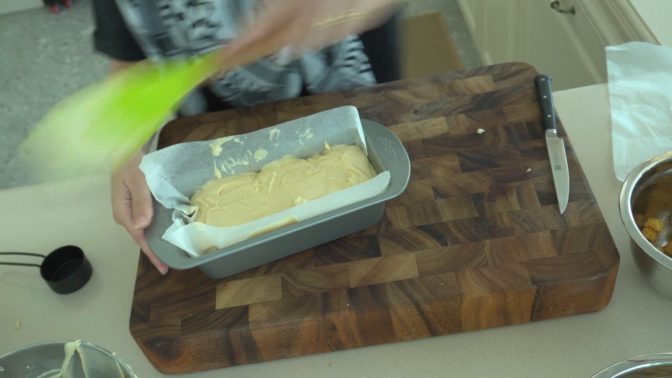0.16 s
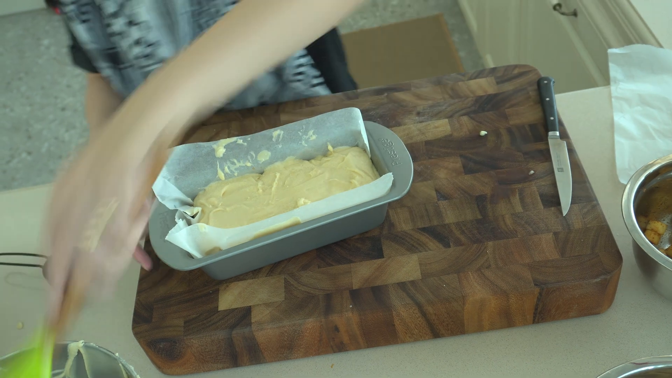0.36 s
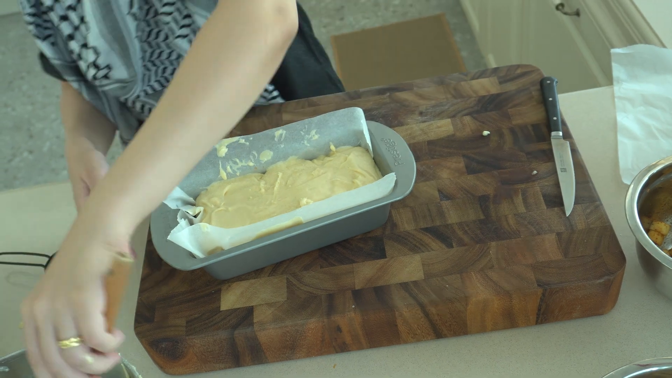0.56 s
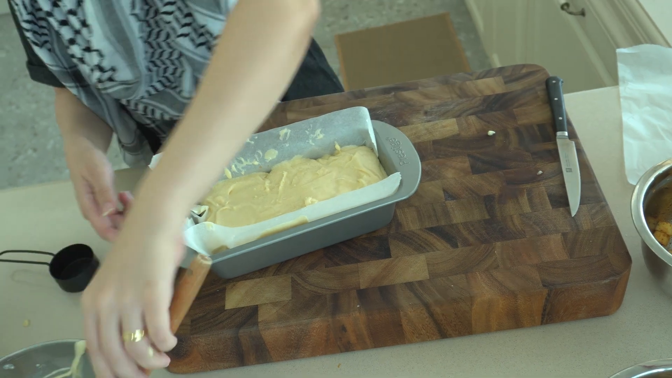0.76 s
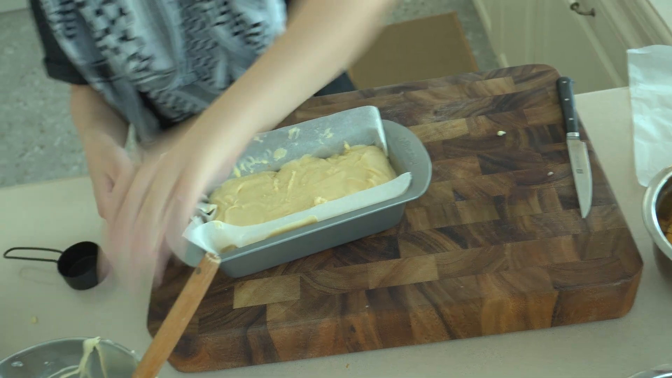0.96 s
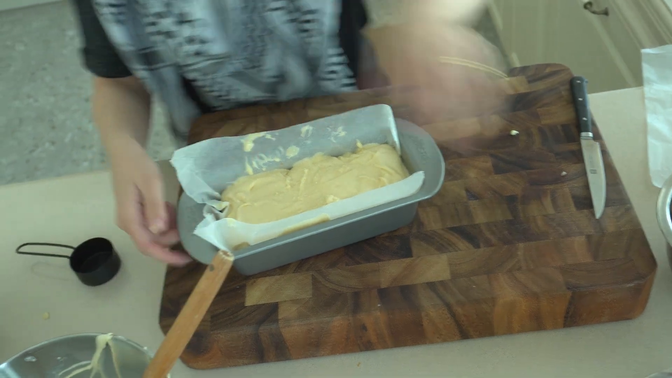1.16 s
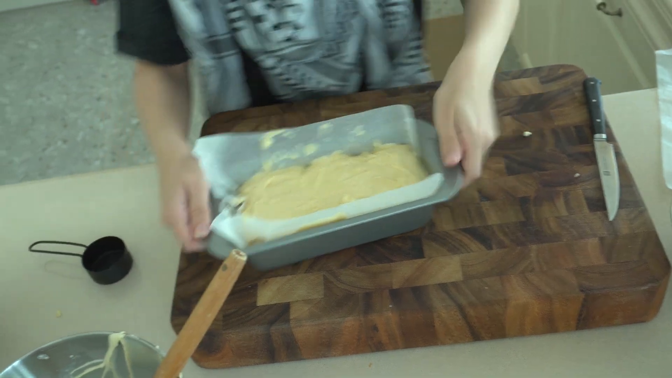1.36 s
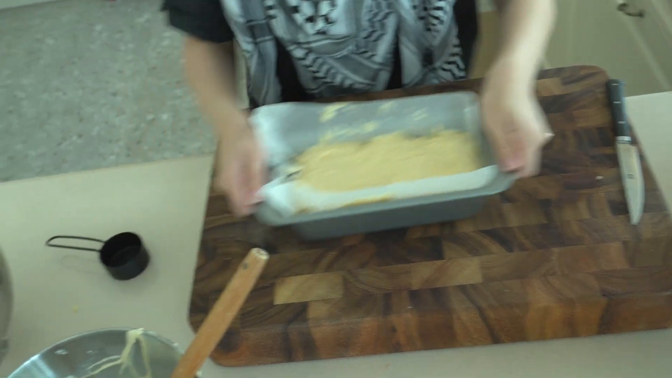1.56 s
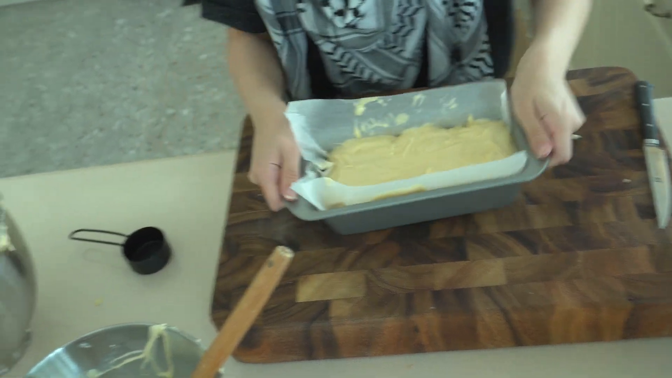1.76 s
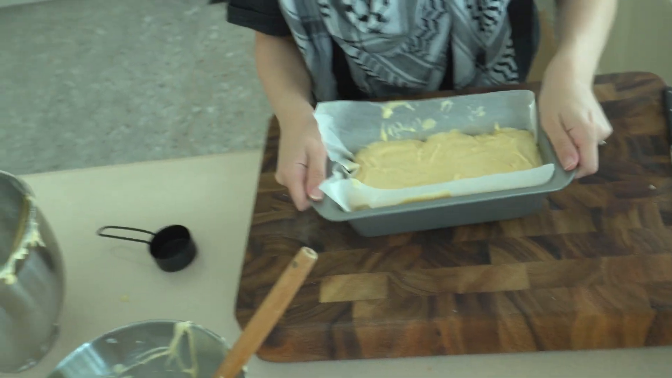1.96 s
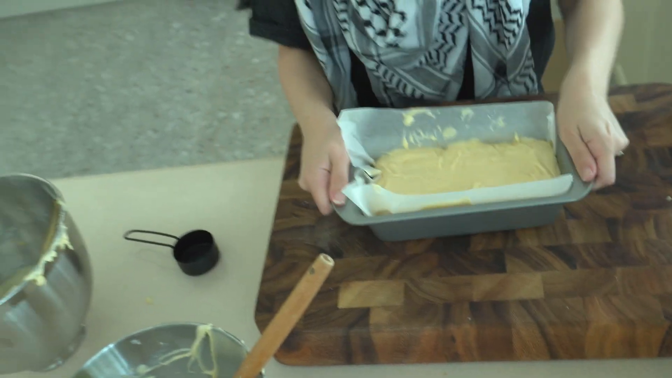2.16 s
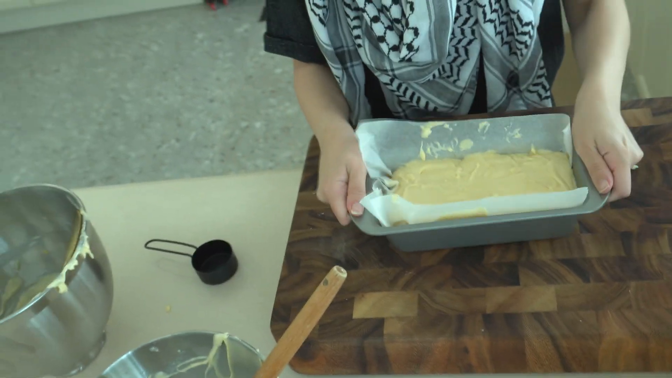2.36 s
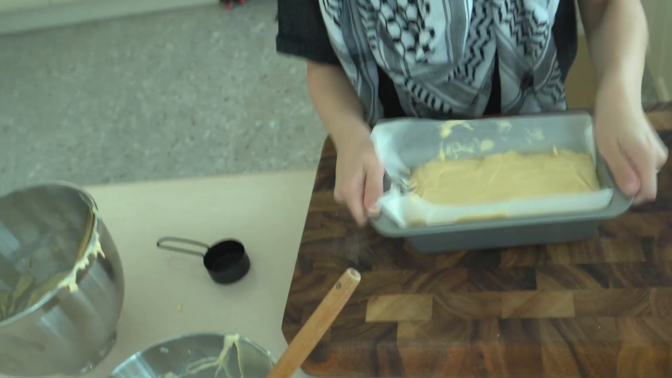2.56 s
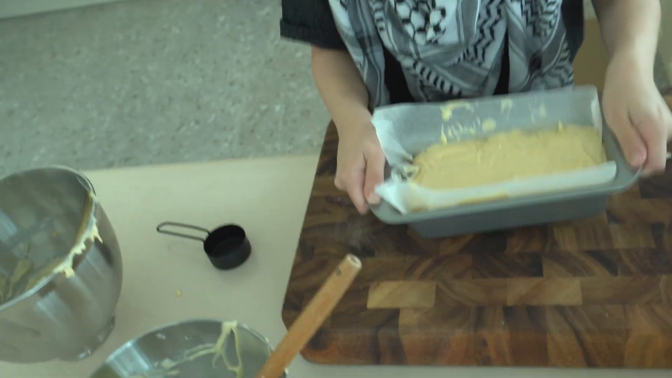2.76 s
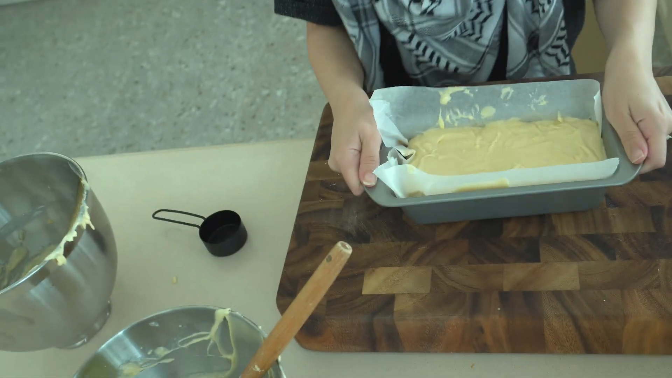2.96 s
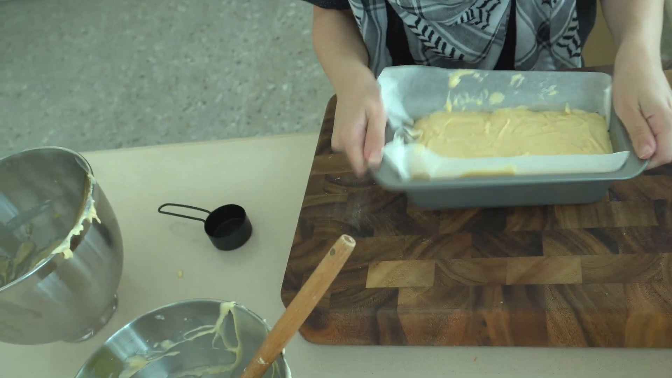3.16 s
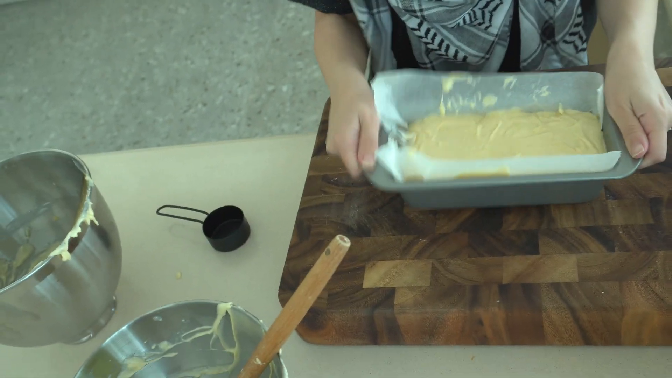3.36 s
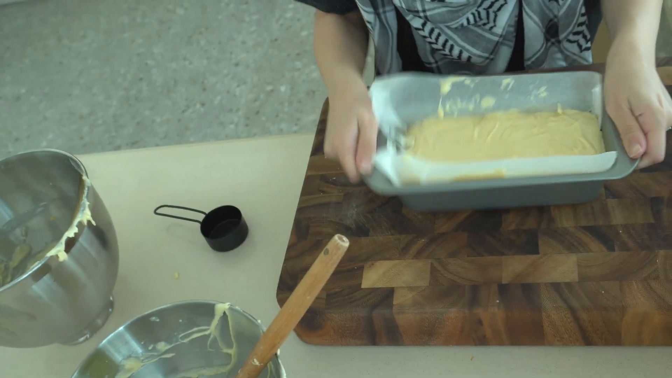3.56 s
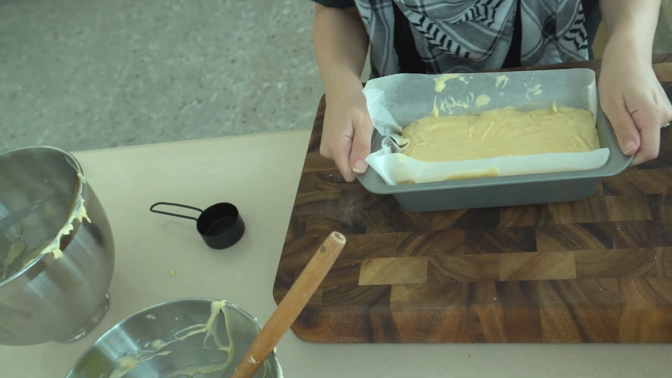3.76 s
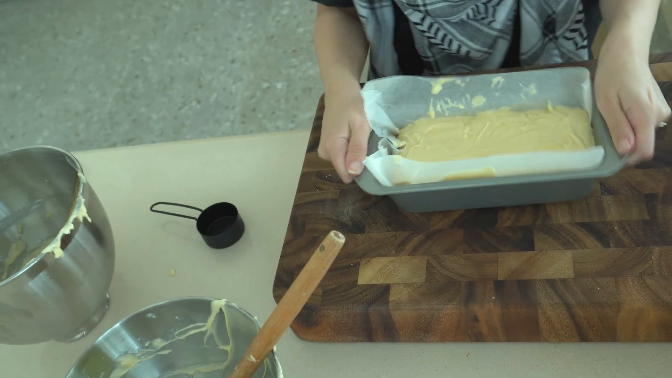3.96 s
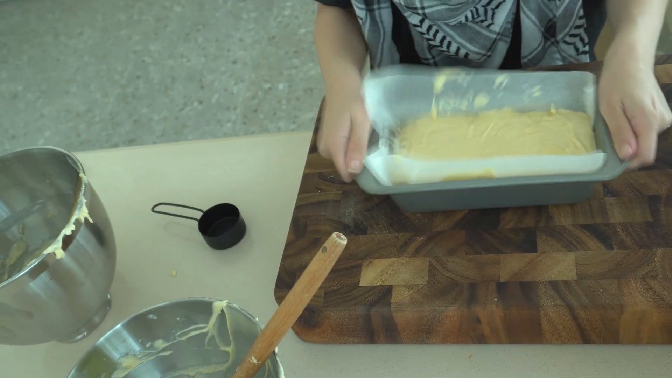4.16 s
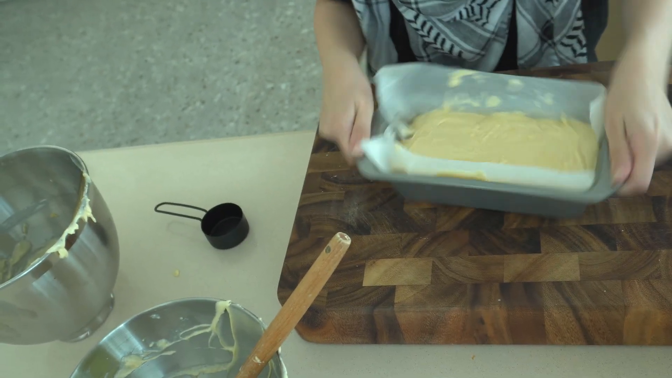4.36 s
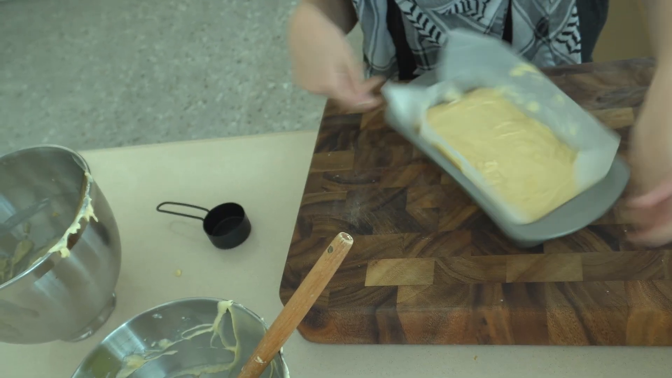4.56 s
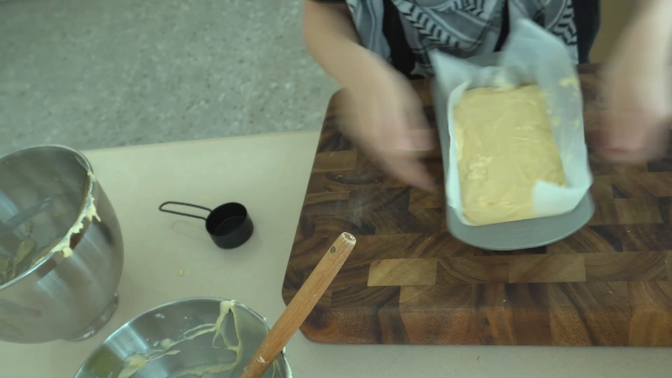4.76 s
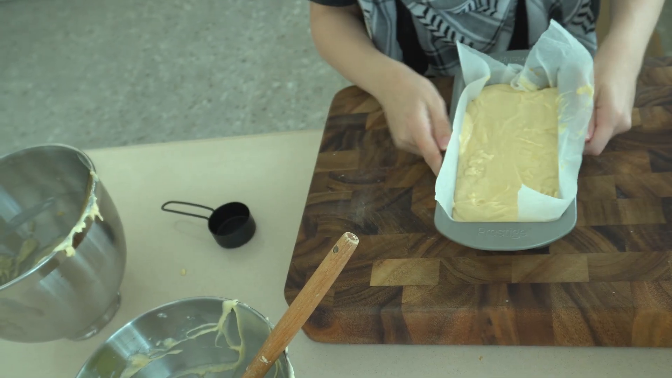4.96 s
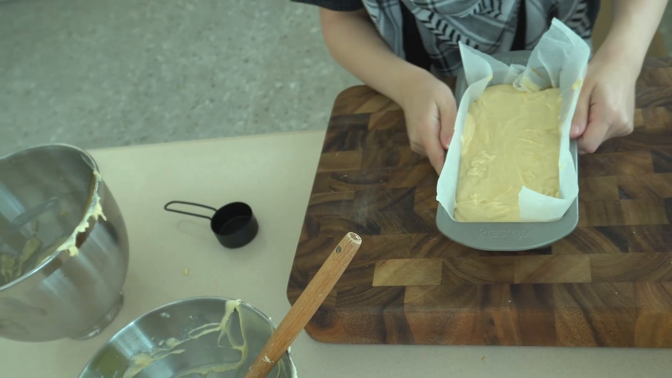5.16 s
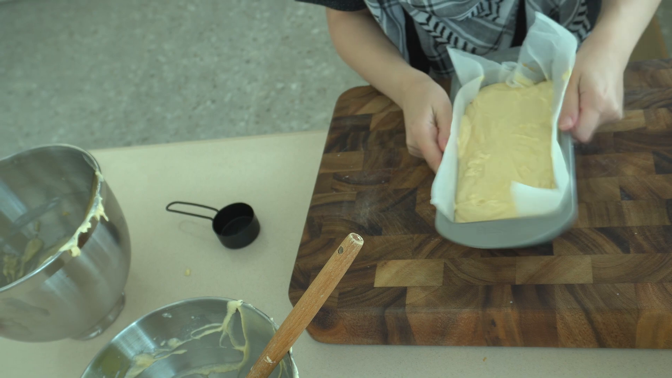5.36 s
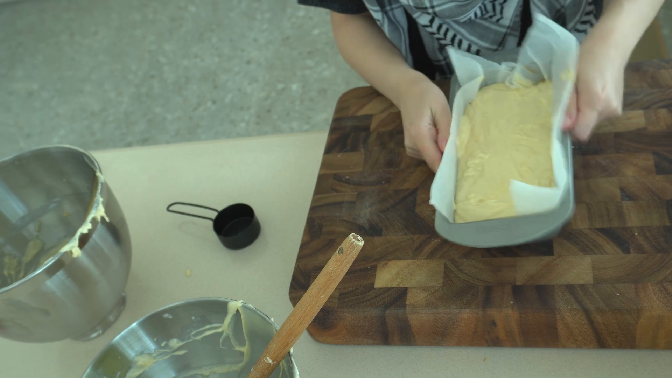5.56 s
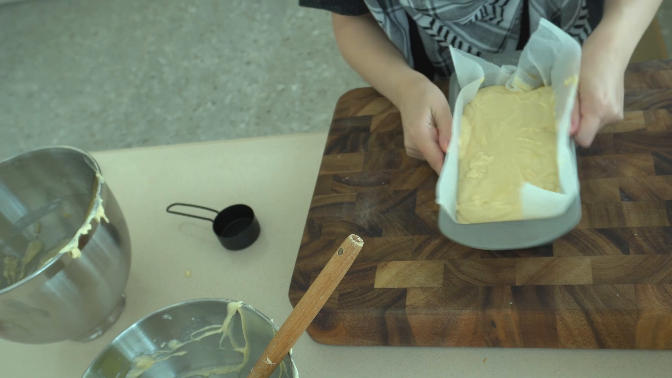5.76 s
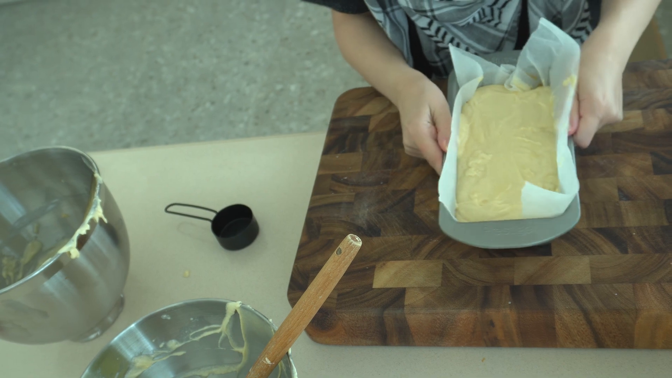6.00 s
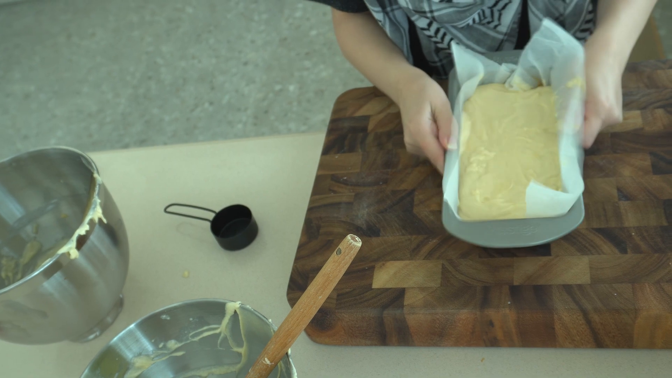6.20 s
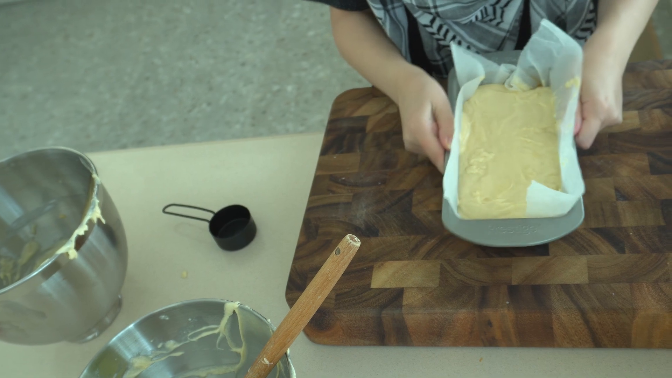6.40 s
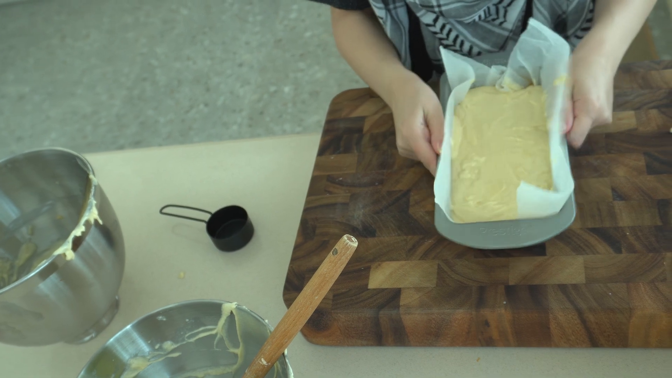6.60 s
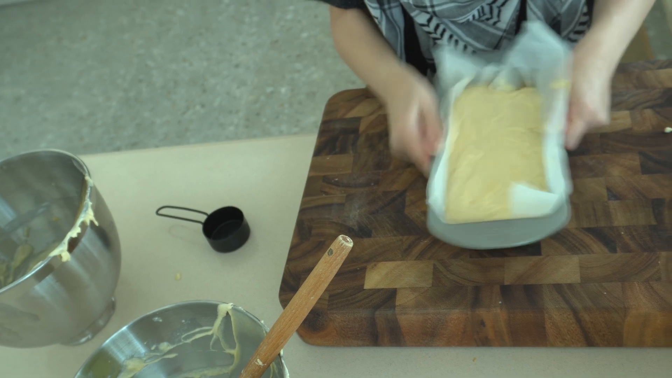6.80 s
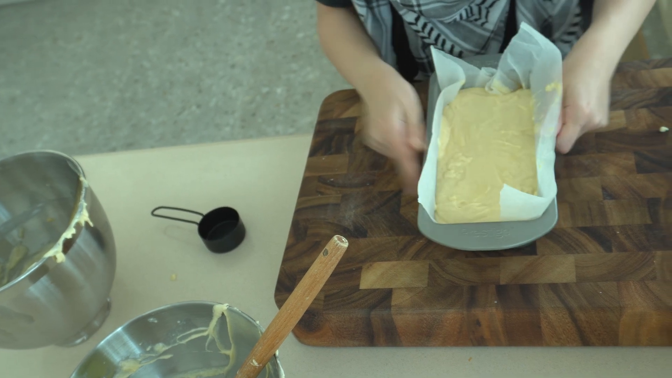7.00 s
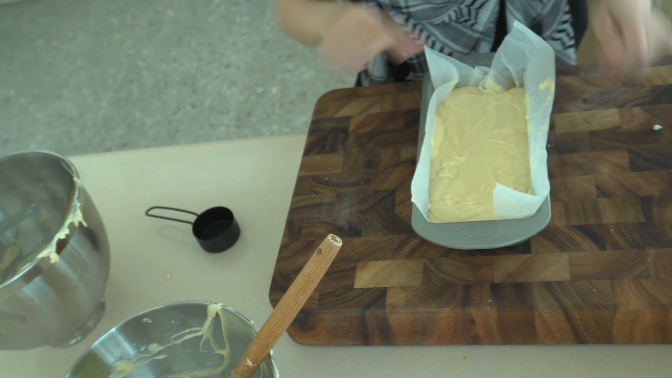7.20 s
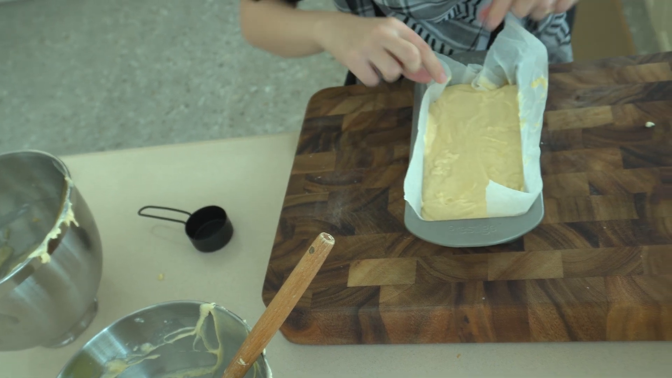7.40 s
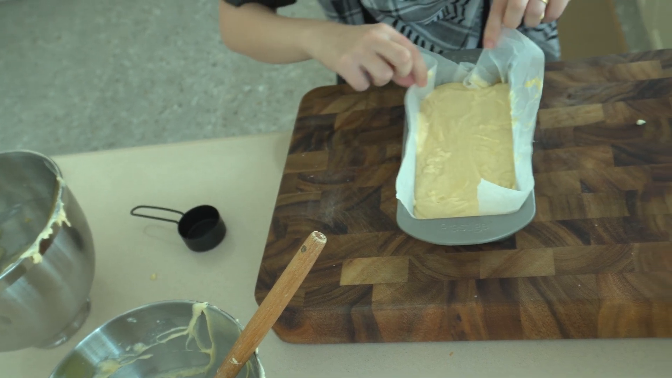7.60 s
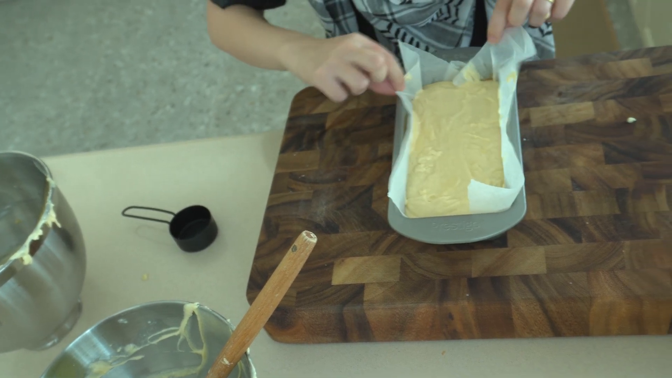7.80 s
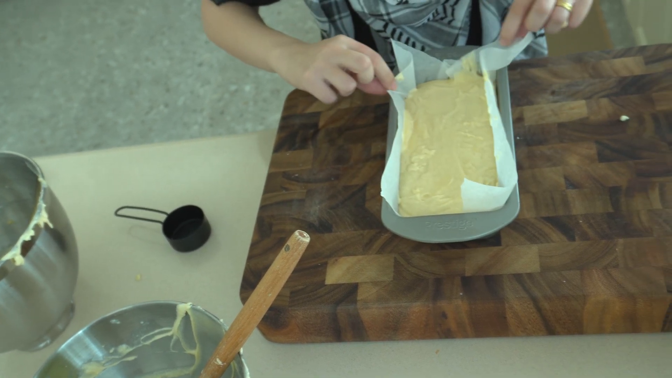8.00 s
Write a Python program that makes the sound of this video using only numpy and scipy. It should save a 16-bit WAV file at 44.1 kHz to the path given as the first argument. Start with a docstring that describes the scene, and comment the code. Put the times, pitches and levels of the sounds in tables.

```python
"""First fingers brush baking paper and a soft-bladed spatula bounces in a steel bowl (damped modes).
Hands then grip and shuffle a metal loaf pan full of batter (rim ticks, rocking modes, low noise).
Runs of knocks on a thick wooden board follow: contact noise and the modes of pan, board, counter and bowls.
At the end the paper is pinched and crackles: snapping creases over a bed of random grains.
A live kitchen adds echoes and a diffuse tail; low rumble and faint hiss last throughout."""
import sys
import numpy as np
from scipy import signal
from scipy.fft import rfft, irfft, next_fast_len
from scipy.io import wavfile
from scipy.ndimage import map_coordinates

SR = 44100
rng = np.random.default_rng(int(sys.argv[2]) if len(sys.argv) > 2 else 0)


def wav_record(signal):
    """Record a signal, one row per channel, as 16-bit PCM in the file named by sys.argv[1]."""
    frames = np.transpose(np.atleast_2d(signal))
    bounded = np.clip(frames, -1, 1)
    # unit amplitude maps onto the largest positive 16-bit level
    quanta = np.round(bounded * 32767).astype(np.int16)
    wavfile.write(sys.argv[1], SR, quanta)


N = 354563
T = np.arange(int(.8 * SR)) / SR  # time within one blow, s

# the pan lands on the board: [t/s, force level/dB, flatness (0 on an edge, 1 on its whole base),
# clank slope above 1 kHz/(dB per octave), bowl hum level/dB, lag of the base behind the edge/s]
KNOCKS = [(1.9434, -8, 1, 9, -36, 0.0045), (2.163, -6, 0.053, 0, -25.5, 0.0037),
          (2.4033, -4, 0.076, -2.5, -27, 0.0039), (2.639, -4.5, 0, 3, -20.5, .0037),
          (2.8882, -2, 0.24, -11, -26, 0.00081), (3.283, -7.5, 0.25, 1.5, -30, 0.0015),
          (3.51, -4, 0, 1.5, -21, 0.0013), (3.747, -7, 0.057, 0, -28, 0.0027),
          (3.998, -3.5, 0.05, 8, -22.5, .0015), (4.2407, -5.5, 0.26, -0.5, -24.5, .0015),
          (5.472, -10, 0.86, 9.5, -58, 0.001064), (5.7174, -6.5, 1, -7, -31.5, 0.00064),
          (5.9492, -7, 1, 9, -41, 0.00079), (6.203, -4, 0.91, -9, -25.5, 0.00065),
          (6.604, -11, 0.97, -4, -36, 0.0049), (6.8442, -9, 1, -9, -34, 0.0043)]
# modes of the pan, the board and the counter: [f/Hz, relative level/dB, t60/s]
PAN_MODES = [(646, -4, 0.02), (939, -6, 0.067), (1090, -14.5, 0.093), (1385, 4.5, 0.0067),
             (1577, 2.5, 0.018), (1640, 5, 0.0048), (1963, -8.5, 0.028)]
BOARD_MODES = [(203, 0, 0.029), (286, 0, 0.046), (406, 1, 0.045), (557, 0.5, 0.017)]
COUNTER_MODES = [(54.8, -15.5, 0.49), (84.7, -10.5, 0.25), (102.5, -6.5, 0.44), (148.8, -10.5, 1),
                 (171, -7.5, 0.13)]  # t60 before any extra damping
# modes of the bowls shaken through the counter: [f/Hz, relative level/dB, t60/s]
BOWL_HUM_MODES = [(393, -15, .5), (436, -15, .5), (465, -14, .5), (533, -14, .5), (896, -4, .36),
                  (905, 0, .52), (930, -3, .5), (1005, -12, .35), (1061, -12, .4), (1266, -9, .45),
                  (1550, -14, .4)]
# the hum's upper modes, which depend on where the pan lands: [t/s, added level/dB]
HIGH_HUM = [(2.9, -11), (3.2, 7.5), (6.2, 1)]
# spectra of a hard and of a soft contact: [f/Hz, relative level/dB]
CRACK_SPECTRUM = [(500, -8), (1500, 6.5), (2600, 2.5), (3700, 0), (5000, -2), (6200, -1), (8000, -11.5),
                  (11000, -18), (16000, -33)]
SOFT_SPECTRUM = [(100, -10), (600, 11), (8000, -26)]
# answer of each part to a knock: [level at full force on an edge/dB, growth/(dB per dB of force),
# level gained by landing flat/dB]
CLANK_LAW = (-14.5, 0.84, -8)  # the batter and the board damp a pan that lands flat
BOARD_LAW = (-21, 1, 6.75)  # a flat base drives the wood harder
CRACK_LAW = (-17, 1, -4.5)
THUD_LAW = (-24, 0.33, -0.29)  # the counter feels mostly the pan's weight
LOW_HUM_BELOW_HZ, HIGH_HUM_ABOVE_HZ = 700, 1200


def knocks():
    """Impact excitation: an edge cracks, the base slaps after it, and the coupled bodies ring in their modes."""
    out = np.zeros((2, N))
    for s, force_db, flat, bright_db, hum_db, slap in KNOCKS:
        # a flat landing is drier, shakes the paper liner and drives the bowls' low modes
        wet_db = -5 * flat
        edge_crack = burst(CRACK_SPECTRUM, t60=0.025)
        base_crack = late(burst(CRACK_SPECTRUM, t60=0.0052), slap)
        liner = amp(-18.5 + 18.3 * flat) * late(burst(CRACK_SPECTRUM, t60=0.093), slap)
        contact = edge_crack + amp(9) * base_crack + liner

        struck = [(hz, db + bright_db * max(np.log2(hz / 1000), 0), t60) for hz, db, t60 in PAN_MODES]
        # the grip and the batter shift the pan's modes
        edge, base = (ring(struck, spread_db=1.5, attack=0.00049, detune=0.043) for _ in range(2))
        metal = edge + amp(-8) * late(base, slap)
        wood = ring(BOARD_MODES, spread_db=1.5, attack=0.0007, detune=0.052)
        thud = ring(COUNTER_MODES, spread_db=4.5, attack=0.0043, detune=0.0073)
        thud = thud * amp(-30 * flat * T)  # a flat landing dies sooner

        high_db = np.interp(s, *np.transpose(HIGH_HUM))
        driven = []
        for hz, db, t60 in BOWL_HUM_MODES:
            low_gain = 13 * flat * (hz < LOW_HUM_BELOW_HZ)
            high_gain = high_db * (hz > HIGH_HUM_ABOVE_HZ)
            driven.append((hz, db + low_gain + high_gain, t60))
        hum = ring(driven, spread_db=2, attack=0.0064, detune=0.0021)

        # the edge grazes just before it lands
        add(out, s - .0035, amp(force_db - 25) * burst(SOFT_SPECTRUM, t60=0.33))
        # (delay/s, dry sound, reverberation/dB, blur, level/dB)
        parts = [
            (0, contact, -2.0, 0.23, answer_db(CRACK_LAW, force_db, flat)),
            (0.00031, metal, wet_db + 2.0, 0.15, answer_db(CLANK_LAW, force_db, flat)),
            (0.0011, wood, wet_db + 1.5, 0.13, answer_db(BOARD_LAW, force_db, flat)),
            (0.0051, thud, wet_db - 5.0, 0.16, answer_db(THUD_LAW, force_db, flat)),
            (0.003, hum, -13, 0.006, hum_db)]
        for delay, sound, part_wet_db, blur, db in parts:
            add(out, s + delay, sized(kitchen(sound, part_wet_db, blur), db))
    return out


def answer_db(law, force_db, flat):
    """Power-law response: a part's level is linear in the force level and in the flatness."""
    full_db, growth, flat_db = law
    return full_db + growth * force_db + flat_db * flat


# the pan rocks back onto the board after a flat landing: [t/s, level/dB]
REBOUNDS = [(5.734, -28), (5.966, -24.5), (6.219, -27), (6.617, -27), (6.8545, -22.5)]


def rebounds():
    """Secondary impact: the pan rocks back and softly excites board, pan and counter modes again."""
    out = np.zeros((2, N))
    for s, db in REBOUNDS:
        bodies = (BOARD_MODES, PAN_MODES, COUNTER_MODES)
        wood, metal, thud = (ring(modes, spread_db=4.5, attack=0.00073, detune=0.02) for modes in bodies)
        damped_thud = thud * amp(-60 * T / .12)
        bump = wood + amp(2.5) * metal + amp(-2) * damped_thud
        add(out, s, sized(kitchen(bump, wet_db=-13, blur=0.076), db))
    return out


# the spatula bounces, and is jolted once more by the hardest knock: [t/s, relative level/dB]
SPATULA = [(0.598, -33), (.841, -7.5), (.849, -10.5), (.853, -12.5), (.860, -11.5), (.868, -13.5),
           (2.927, -8.5)]
# modes of the struck bowl: [f/Hz, relative level/dB, t60/s]
BOWL_STRUCK_MODES = [(280, 0, 0.1), (460, -4, 0.26), (533, -3, 0.29), (600, 2, 0.08), (690, -1, 0.11),
                     (1050, -7, 0.05), (1320, -6, 0.045), (1743, -6, 0.055), (2153, -21, 0.25),
                     (2950, -13, 0.05), (4460, -28, 0.3), (6180, -21, 0.28), (7500, -14, 0.05)]


def spatula():
    """Modal ringing of a steel bowl, excited by the repeated impacts of a soft blade."""
    out = np.zeros((2, N))
    for s, db in SPATULA:
        bowl = ring(BOWL_STRUCK_MODES, spread_db=1, attack=0.0003, detune=0.005)
        hard = burst(CRACK_SPECTRUM, t60=0.04)
        soft = burst(SOFT_SPECTRUM, t60=0.035)
        blow = bowl + amp(-18) * hard + amp(-8) * soft
        add(out, s, amp(db - 1.5) * kitchen(blow, wet_db=-6, blur=0.11))
    return out


# hands catch the rim, or it rattles as it settles, and the pan rocks:
# [t/s, relative tick level/dB, relative rocking level against the tick/dB]
GRIPS = [(1.3689, -8.5, -17.5), (1.5659, -26, -16.5), (1.5858, -27, -27), (1.7935, -31, -34),
         (1.965, -29, -20), (1.978, -35, -32)]
# modes of the rim: [f/Hz, relative level/dB, t60/s]
RIM_MODES = [(690, -4, .07), (2120, 1, .08), (2420, -1, .05), (4310, -14, .13), (4603, -15, .28),
             (5862, -17, .07), (7850, -21, .07)]
# soft bumps on the counter: [t/s, relative level/dB]
BUMPS = [(0.293, -36.5), (1.231, -34), (1.856, -32), (2.804, -19), (7.693, -32), (7.951, -32.5)]
# the pan shuffles and judders over the board: [t/s, level/dB]
SHUFFLE = [(1.5, -54), (1.6, -32.5), (1.772, -38.5), (1.922, -26), (2.213, -27), (2.353, -32)]
# spectrum of the judder: [f/Hz, relative level/dB]
JUDDER_SPECTRUM = [(25, -17), (70, 6), (280, -10), (1500, -70)]


def handling():
    """Impact and friction: hands tick the rim, rock the pan, bump the counter and shuffle the pan as noise."""
    out = np.zeros((2, N))
    rock_modes = [(107, -10.0, 0.056), (228, -2.5, 0.038), (297.6, -9.5, 0.11)]  # [f/Hz, dB, t60/s]
    for s, db, rock_db in GRIPS:
        rim = ring(RIM_MODES, spread_db=1.5, attack=0.00035, detune=.004)
        tick = rim + amp(-4.0) * burst(CRACK_SPECTRUM, t60=0.017)
        rock = ring(rock_modes, spread_db=3.0, attack=0.00051)
        # a faint papery noise leads into each tick
        add(out, s - .013, amp(db - 31.0) * burst(PAPER_SPECTRUM, t60=1.0))
        add(out, s, amp(db - 4) * kitchen(tick, wet_db=-3, blur=0.17))
        add(out, s + 0.0056, amp(db + rock_db + 20.5) * kitchen(rock, wet_db=-18.5, blur=0.12))
    for s, db in BUMPS:
        bump = ring(COUNTER_MODES, spread_db=2.0, attack=0.0012, detune=0.078)
        bump = bump * amp(-60 * T / 0.64)  # extra damping
        add(out, s, amp(db + 6.5) * kitchen(bump, wet_db=-10.0, blur=0.31))
    s, db = np.transpose(SHUFFLE)
    level = amp(np.interp(np.arange(N) / SR, s, db, left=-120, right=-120))
    return out + level * coloured(rng.standard_normal(N), JUDDER_SPECTRUM)


# the loudest paper creases snapping: [t/s, relative level/dB]
SNAPS = [(.014, -25), (2.371, -24), (3.668, -22.5), (3.7075, -20), (5.217, -25), (5.233, -26.5),
         (5.263, -29), (6.586, -23.5), (1.589, -27), (1.673, -25.5), (7.553, -27), (7.666, -22.5),
         (7.623, -17), (7.66, -20.5), (7.6908, -12.5), (7.728, -11.5), (7.739, -11), (7.747, -17.5),
         (7.778, -17), (7.794, -14.5), (7.813, -11), (7.819, -18.5), (7.874, -18.5), (7.901, -17.5),
         (7.922, -17), (7.928, -7.5)]
# spectrum of crackling paper: [f/Hz, relative level/dB]
PAPER_SPECTRUM = [(300, -14), (1200, 7.5), (2500, 6), (6500, -0.5), (9000, -7), (16000, -23)]
GRAINS_PER_S = 2800  # for each facet size


def paper():
    """Crackling noise: stiff baking paper as snapping creases over a random train of tiny grains."""
    crinkle = np.zeros(N)
    for hz in (1300, 2070, 3800, 6100, 10800):  # facets of each size crackle on their own
        happens = rng.random(N) < GRAINS_PER_S / SR
        sizes = rng.standard_normal(N) * amp(4 * rng.standard_normal(N))
        band = [(hz / 3, -30), (hz, 0), (hz * 3, -30)]
        crinkle += np.sqrt(hz) * coloured(happens * sizes, band)
    crinkle = brushing() * coloured(crinkle, PAPER_SPECTRUM)
    tail = signal.fftconvolve(crinkle[None], reverberation(), axes=1)[:, :N]
    out = crinkle + amp(-2.0) * stereo(*tail)
    for s, db in [*SNAPS, *small_creases()]:
        add(out, s, snap(db))
    return out


# fingers brushing over the paper: [start t/s, length/s, relative level/dB]
BRUSHES = [(0.08, 0.2, -59), (1.403, 0.16, -45), (1.56, 0.032, -31.5), (1.636, 0.062, -37.5),
           (4.48, 0.083, -48.5), (4.64, 0.3, -51.5), (7.528, 0.26, -49), (7.717, 0.37, -47)]
BRUSH_ATTACK_S, BRUSH_RELEASE_S = 0.021, 0.012  # time constants
CATCHES_PER_S, CATCH_DB = 90, 3  # rate of the random points, and their spread


def brushing():
    """Stick-slip friction: each stroke rises, holds and dies away, its strength catching and slipping."""
    t = np.arange(N) / SR
    level = np.zeros(N)
    for s, length, db in BRUSHES:
        attack = 1 - np.exp(-np.maximum(t - s, 0) / BRUSH_ATTACK_S)
        release = np.exp(-np.maximum(t - s - length, 0) / BRUSH_RELEASE_S)
        level += amp(db) * attack * release
    points = rng.standard_normal(int(t[-1] * CATCHES_PER_S) + 2)
    catches = map_coordinates(points, [t * CATCHES_PER_S])
    return level * unit(amp(CATCH_DB * catches))


PINCH_START_S, PINCH_END_S = 7.55, 8.04
PINCH_RISE_S = 0.062  # time constant of the tightening fingers
CREASES_PER_S, CREASE_DB, CREASE_SPREAD_DB = 50, -30, 3.5  # levels relative, as in SNAPS


def small_creases():
    """Random yielding: (t/s, level/dB) of weak snaps, growing as the fingers tighten in the pinch."""
    slots = np.arange(PINCH_START_S, PINCH_END_S, 1 / CREASES_PER_S)
    times = slots + rng.random(len(slots)) / CREASES_PER_S
    grip = 1 - np.exp(-(times - PINCH_START_S) / PINCH_RISE_S)
    grip_db = 20 * np.log10(grip + 1e-6)
    return zip(times, CREASE_DB + grip_db + CREASE_SPREAD_DB * rng.standard_normal(len(slots)))


SNAP_HZ, SNAP_DB_PER_OCTAVE = 9030, 12  # pitch of a snap at 0 dB; weaker snaps are lower
FACET_RATIO = 1.362  # the facet's middle pitch over that of its snap


def snap(db):
    """Buckling: a crease snaps, its facet rings and the sheet pops; stiffer creases are louder and brighter."""
    hz = SNAP_HZ * 2 ** (db / SNAP_DB_PER_OCTAVE)
    facet_hz = FACET_RATIO * hz * 2 ** (.3 * rng.standard_normal())
    facet_modes = [(facet_hz, 0, .013), (facet_hz * 1.35, -6, .008), (1500, -5, .018)]
    facet = ring(facet_modes, spread_db=3.5, attack=.0001, detune=0.09)
    tick = burst([(hz / 4, -9), (hz, 0), (hz * 3, -12), (hz * 6, -26)], t60=0.01)
    pop = burst(PAPER_SPECTRUM, t60=0.041)
    direct = facet + amp(-2.0) * tick + amp(-10) * pop
    return amp(db - 4.5) * kitchen(direct, wet_db=-6, blur=0.16)


# spectrum of the room tone: [f/Hz, relative level/dB]
AIR_SPECTRUM = [(12, -32), (20, 2.5), (101, -6.5), (290, -9.5), (700, -14), (2530, -27), (16000, -45.5)]
AIR_DB = -47  # rms level


def room_tone():
    """Stationary noise: a steady low rumble and faint hiss."""
    return amp(AIR_DB) * coloured(rng.standard_normal(N), AIR_SPECTRUM)


# early echoes: [delay t/s, level before the treble loss/dB]
WALLS = [(0.0149, -18.5), (0.0243, -15.5), (.031, -13.5)]
# stereo width of the treble: [f/Hz, side level/dB]
WIDTH = [(3000, -60), (4600, -18), (12000, -12)]


def kitchen(x, wet_db, blur):
    """Room response: direct sound, early reflections and a tail that follows the blow's smoothed power."""
    # the room hears all directions, so peaks and notches blur by this share of their frequency
    power = np.abs(rfft(x)) ** 2
    bins = np.arange(len(power))
    total = np.cumsum(power)
    reach = 1 + blur * bins
    above = np.interp(bins + reach, bins, total)
    below = np.interp(bins - reach, bins, total)
    smooth = np.abs(above - below) / (2 * reach)
    tail = filtered(reverberation(), lambda hz: np.sqrt(np.interp(hz, bins * SR / len(T), smooth)))
    build_up = 1 - np.exp(-(T / 0.0049) ** 2)
    mid, side = amp(wet_db) * tail * build_up
    echoes = sum(amp(db) * late(x, s) for s, db in WALLS)
    dull = filtered(echoes, lambda hz: 1 / (1 + 1j * hz / 2500))  # the things near by scatter the treble
    # the treble reaches the two sides out of step
    skew = rng.choice([-1, 1]) * filtered(x, lambda hz: 1j * amp(along(WIDTH, hz)))
    return stereo(x + dull + mid, side + skew)


# decay of the room: [f/Hz, t60/s]
ROOM_T60 = [(100, 0.89), (400, 0.64), (1100, 0.76), (3000, 0.76), (6500, 0.65), (14000, 0.39)]
# colour of the tail: [f/Hz, relative level/dB]
ROOM_COLOUR = [(100, 2.5), (250, -2.5), (500, -1.5), (1000, 0), (1700, -8), (3000, -5.5), (6500, -4.5),
               (14000, -4)]


def reverberation():
    """Diffuse field: mid and side noise dying at each frequency's own rate, wide only in the treble."""
    hz, t, z = signal.stft(rng.standard_normal((2, len(T))), SR, nperseg=256)
    decay = amp(-60 * t / along(ROOM_T60, hz)[:, None])
    tail = signal.istft(z * decay, SR, nperseg=256)[1][:, :len(T)]

    def colour(f):
        """Spectral weighting of mid and side."""
        mid_side = np.array([np.ones_like(f), amp(along(WIDTH, f) - 32)])
        return amp(along(ROOM_COLOUR, f)) * mid_side

    return filtered(tail / np.linalg.norm(tail[0]), colour)


def ring(modes, spread_db, attack, detune=0.):
    """Modal synthesis: damped sines at new strengths and slightly new pitches for every blow."""
    hz, db, t60 = np.transpose(modes)[..., None]
    luck, shift = rng.standard_normal((2, len(modes), 1))
    size = amp(db + spread_db * luck)
    sign = (-1) ** np.arange(len(modes))[:, None]
    sines = np.sin(2 * np.pi * hz * (1 + detune * shift) * T)
    waves = sign * size * amp(-60 * T / t60) * sines
    return waves.sum(0) * (1 - np.exp(-T / attack)) / np.linalg.norm(size)


def burst(spectrum, t60):
    """High modal density: a contact's countless short-lived modes, heard as dying noise."""
    return coloured(rng.standard_normal(len(T)), spectrum) * amp(-60 * T / t60)


def amp(db):
    """Logarithmic level: decibels to gain."""
    return 10 ** (np.asarray(db) / 20)


def unit(x):
    """Normalisation: scale to rms 1."""
    return x / np.sqrt(np.mean(x ** 2) + 1e-20)


def sized(x, db):
    """Energy equivalence: a stereo blow whose left energy is that of 0.1 s at this rms level."""
    return amp(db) * x / np.sqrt(np.sum(x[0] ** 2) / (SR / 10))


def along(points, hz):
    """Interpolation of (f/Hz, value) points on a logarithmic frequency axis."""
    f, v = np.transpose(points)
    return np.interp(np.log(hz + 1), np.log(f), v)


def filtered(x, response):
    """Linear filtering: the spectrum of x times a response of frequency."""
    n = x.shape[-1]
    m = next_fast_len(n + 8192)
    return irfft(rfft(x, m) * response(np.fft.rfftfreq(m, 1 / SR)), m)[..., :n]


def coloured(x, spectrum):
    """Spectral shaping: x weighted by the given spectrum, at rms 1."""
    return unit(filtered(x, lambda hz: amp(along(spectrum, hz))))


def late(x, s):
    """Propagation delay of s seconds."""
    return np.interp(T - s, T, x, left=0)


def stereo(mid, side):
    """Sum and difference: left and right from mid and side."""
    return np.array([mid + side, mid - side])


def add(track, s, x):
    """Superposition: mix x into the track at time s."""
    i = max(round(s * SR), 0)
    part = track[..., i:i + x.shape[-1]]
    part += x[..., :part.shape[-1]]


def scene():
    """Superposition of everything on the counter, heard from just above it."""
    return knocks() + rebounds() + spatula() + handling() + room_tone() + paper()


TOP_HZ = 16200  # band limit


def record(dry):
    """Saturation and band limiting: the hardest peaks are rounded off, then a steep low-pass follows."""
    rounded = dry / (1 + np.abs(dry / .92) ** 4) ** (1 / 4)
    return filtered(rounded, lambda hz: 1 / np.sqrt(1 + (hz / TOP_HZ) ** 160))


dry = scene()
out = record(dry)
wav_record(out)
```